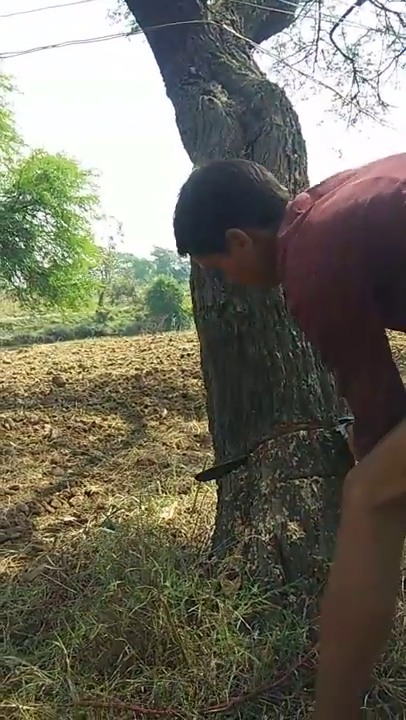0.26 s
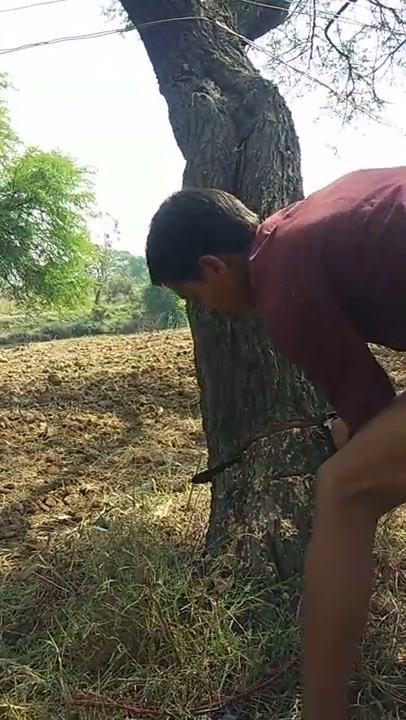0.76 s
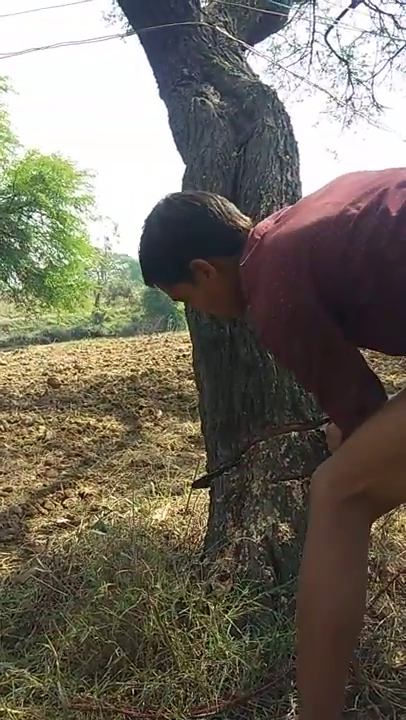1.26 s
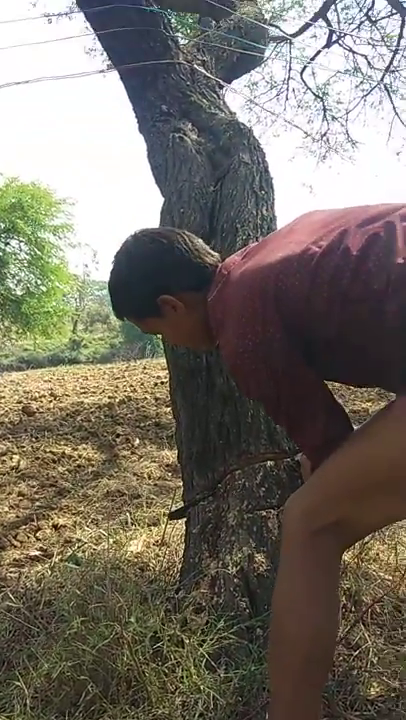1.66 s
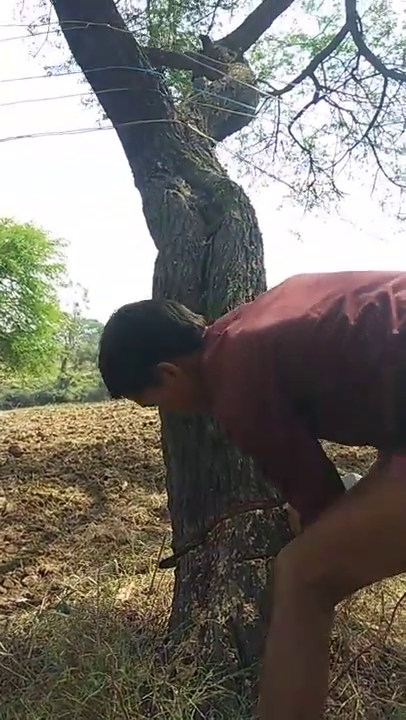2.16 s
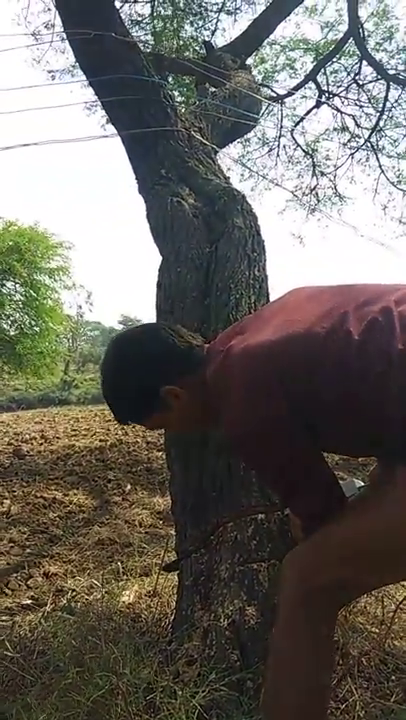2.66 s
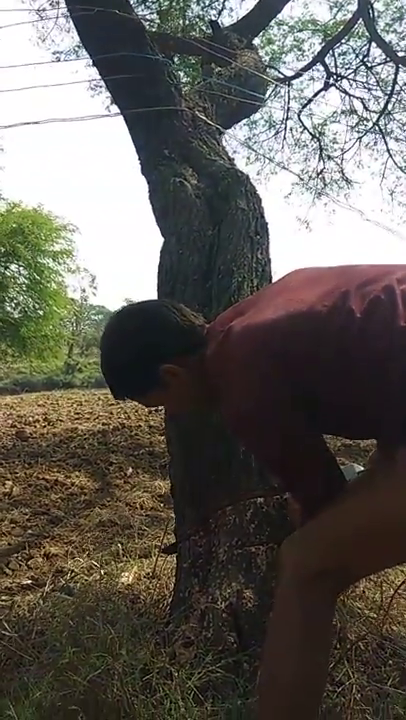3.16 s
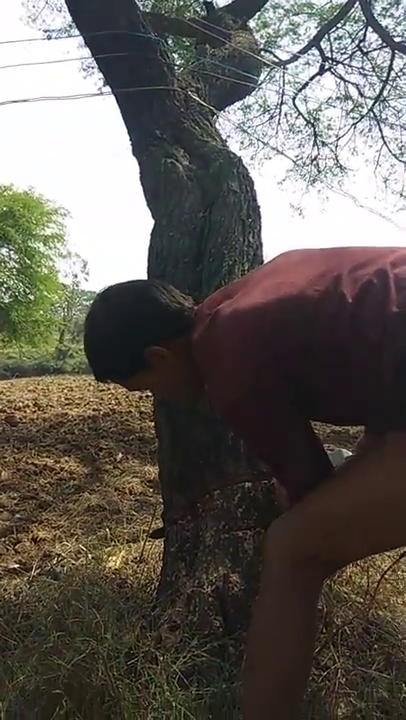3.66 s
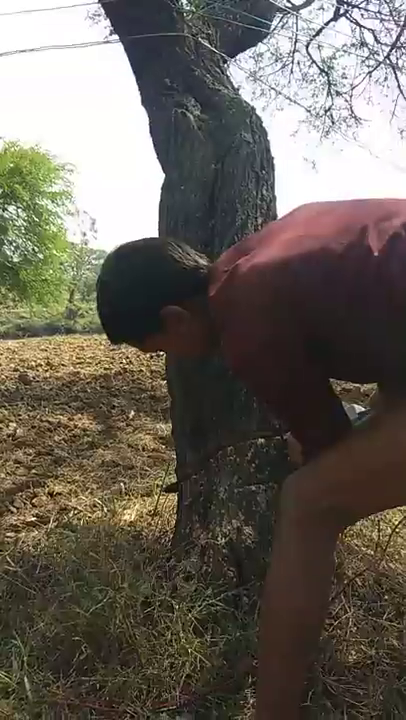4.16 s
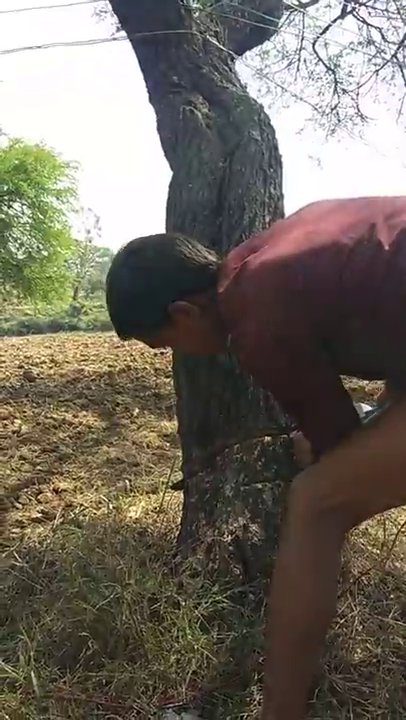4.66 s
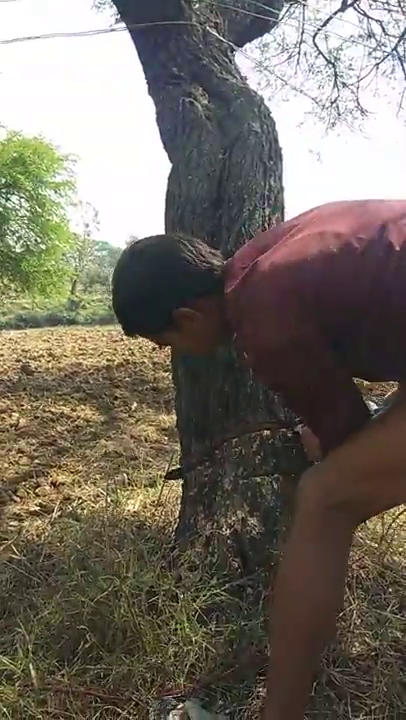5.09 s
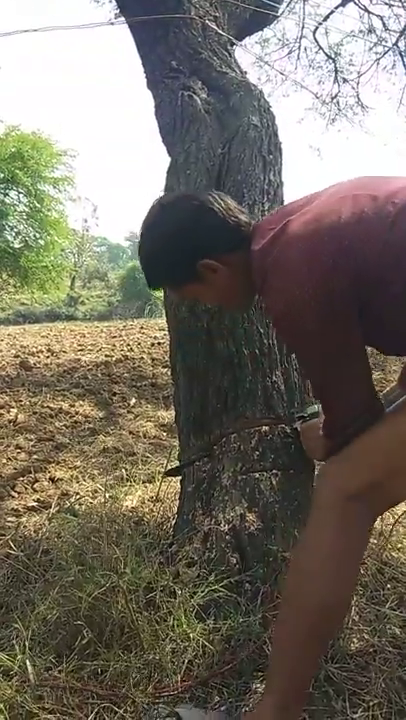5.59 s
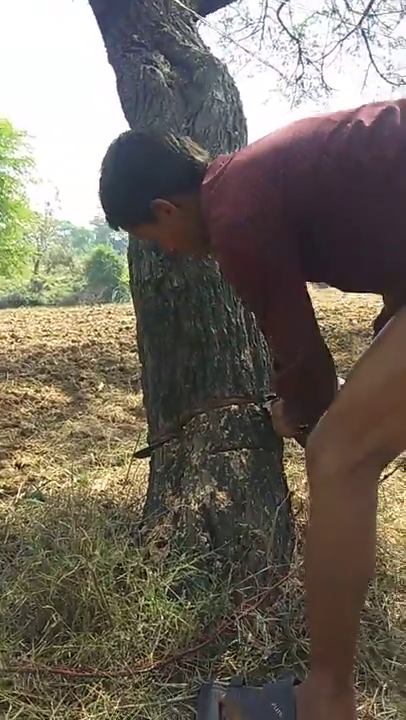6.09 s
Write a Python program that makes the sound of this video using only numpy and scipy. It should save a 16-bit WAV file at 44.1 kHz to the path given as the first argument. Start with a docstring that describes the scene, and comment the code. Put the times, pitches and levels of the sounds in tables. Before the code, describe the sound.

A small electric chainsaw is already running outdoors, its chain rattling and slapping on the steel bar over a thin hiss of fan air and chips. At about 0.5 seconds a high gear whine stands out and slides down as the saw bites into a tree trunk. From 1 to 3.5 seconds it labors at a lower, wavering pitch, swelling and nearly fading, with quieter chain noise. The housing knocks lightly on the trunk around 0.8, 1.5 and 2.5 seconds. From about 3.7 seconds the chain slaps and ticks more often and the whine climbs unevenly, dipping near 4.4 seconds, over a faint low hum. Pitch and clatter peak around 5.5 seconds. The whine then falls and dies away by about 5.8 seconds, while the chain keeps rattling more softly until the end at 6.3 seconds. Faint wind puffs thump the microphone in the last second or so.

```python
"""Electric chainsaw in a trunk.

A small saw cuts outdoors. Its gears whine on the tooth-mesh pitch, which sags under load. The chain rattles,
slaps and ticks on the steel bar, fan and chips hiss, the housing hums and knocks on the trunk, light wind
thumps. Two microphone ports a few centimetres apart hear it."""
import sys
import numpy as np
from scipy import signal
from scipy.fft import rfft, irfft, next_fast_len
from scipy.io import wavfile
from scipy.ndimage import uniform_filter1d, map_coordinates

SR = 44100
rng = np.random.default_rng(int(sys.argv[2]) if len(sys.argv) > 2 else 0)


def wav_record(signal):
    """Record a signal, one row per channel, as 16-bit PCM in the file named by sys.argv[1]."""
    frames = np.transpose(np.atleast_2d(signal))
    bounded = np.clip(frames, -1, 1)
    # unit amplitude maps onto the largest positive 16-bit level
    quanta = np.round(bounded * 32767).astype(np.int16)
    wavfile.write(sys.argv[1], SR, quanta)


N = 279153

# Running chain. Each row: time in seconds, bar ring in dB, clatter and hiss in dB.
CHAIN_LEVELS = [(0.0, -18, -24), (0.4, -26, -27.5), (0.51, -20.5, -21.5), (0.66, -28.5, -30),
                (0.97, -31.5, -37.5), (1.23, -33, -40), (3.28, -36, -42), (3.63, -33.5, -41),
                (3.83, -29.5, -36), (4.14, -27, -32.5), (4.3, -34.5, -37), (4.57, -33, -42.5),
                (4.9, -27.5, -33.5), (5.09, -26, -29), (5.55, -23, -23), (5.7, -24, -29.5),
                (6.01, -26.5, -36.5), (6.2, -29.5, -43), (6.33, -32.5, -46)]
# Bar and housing resonances. Each row: frequency in Hz, width in Hz, gain in dB.
BAR_MODES = [(807, 403, -8), (1136.3, 66.3, 5.5), (1708, 160, -3), (1730, 138, -2.5), (2138, 64, -8),
             (3372, 63, -11), (3920, 105, -15.5), (4900, 94, -20), (5775, 71, -15.5), (6210, 210, -20)]
# Link clatter spectrum. Each row: frequency in Hz, gain in dB.
CLATTER_SPECTRUM = [(400, -25), (700, -31.5), (1200, -3.5), (2600, -15.5), (3500, -12), (4900, -17),
                    (6200, -17), (8000, -28), (11000, -30.5)]
# Fan and chip spectrum. Each row: frequency in Hz, gain in dB.
HISS_SPECTRUM = [(6000, -15), (7000, 3.5), (7900, -6), (9400, 5.5), (10300, 1), (11200, 9), (13000, 8.5),
                 (15600, 9.5)]
# Housing hum. Each row: time in seconds, level in dB.
HUM_LEVELS = [(0, -52), (.7, -46.5), (1.1, -61), (3.45, -61.5), (3.87, -49), (4.4, -52.5), (4.55, -54),
              (4.74, -44.5), (5.08, -68), (5.25, -45.5), (5.5, -62), (6.33, -87)]
# Motor speed and tooth pressure. Each row: time in seconds, mesh pitch in Hz, whine in dB.
GEAR_MESH = [(0.46, 2014, -33), (0.53, 1925, -20), (0.61, 1800, -20), (0.7, 1610, -13), (0.84, 1287, -13),
             (0.9, 1135, -25.5), (1.18, 1138, -25), (1.21, 1075, -26), (1.28, 998, -22), (1.374, 906, -22),
             (1.564, 868, -26), (1.66, 915, -42), (1.8, 930, -40), (1.98, 893, -26), (2.104, 1023, -42.5),
             (2.356, 1061, -17), (2.504, 902, -40), (2.784, 1049, -28), (3.0, 878, -31.5),
             (3.266, 1052, -30), (3.542, 1053, -24), (3.7, 1158, -20), (3.78, 1164, -37.5),
             (3.9, 1228, -22), (4.226, 1297, -19.5), (4.39, 1016, -26), (4.8, 1189, -24), (4.86, 1253, -18),
             (4.96, 1350, -26.5), (5.52, 1980, -34), (5.6, 1733, -19), (5.67, 1602, -16), (5.76, 1510, -47),
             (6.33, 792, -74)]
# Partials above the mesh tone. Each row: multiple of the mesh pitch, gain in dB.
MESH_OVERTONES = [(2, -13), (3.05, -9.5), (4.099, -13), (5.1, -9), (6.1, -11.5)]
# Third partial, fading as the motor first bogs down. Each row: time in seconds, added gain in dB.
THIRD_PARTIAL_FADE = [(1.17, 5), (1.24, 0), (1.62, -12), (1.8, 6)]
# Gear case resonances. Each row: frequency in Hz, width in Hz, gain in dB.
CASE_MODES = [(1165, 74.5, 4.5), (1543, 330, -2), (1767, 177, 1), (2088, 150, 2), (2900, 120, -7),
              (3475, 370, -8.5), (3860, 200, -9.5), (4490, 710, -14), (6010, 190, -3)]
# Slack chain hitting the bar. Each row: time in seconds, relative level in dB.
CHAIN_SLAPS = [(0.0525, -8), (0.0765, -12), (0.1345, -5.5), (0.2134, -17), (0.2394, -10), (0.2938, -7.5),
               (0.3572, -7.5), (0.3716, -6.5), (0.4501, -17), (0.5306, -12), (0.5841, -19), (0.622, -8),
               (0.6874, -12), (0.9818, -13), (1.5359, -19.5), (1.923, -19), (2.406, -11.5), (2.801, -17),
               (3.398, -13), (3.4282, -17), (3.6091, -14), (3.624, -12), (3.7661, -5), (3.7821, -8),
               (3.804, -8.5), (3.8243, -11), (3.849, -9), (3.8907, -8.5), (4.0358, -10.5), (4.046, -15),
               (4.0588, -8.5), (4.1414, -10), (4.1878, -5.5), (4.653, -9), (4.8379, -10), (4.881, -5.5),
               (4.9229, -6), (4.9634, -12), (4.996, -10.5), (5.037, -4), (5.0738, -16), (5.111, -8),
               (5.1452, -11), (5.211, -12), (5.2426, -6.5), (5.396, -4), (5.4238, -15), (5.5115, -10),
               (5.5407, -7), (5.601, -8.5), (5.6412, -17), (5.6996, -13), (5.7328, -10.5), (5.8443, -12.5),
               (5.8863, -10.5), (5.9278, -8.5), (6.019, -6.5), (6.0673, -8.5), (6.119, -14), (6.1734, -8),
               (6.2345, -11), (6.3002, -12.5)]
# Sharp ticks. Each row: time in seconds, relative level in dB.
CHAIN_TICKS = [(0.621, -13), (0.648, -10.5), (0.902, -19.5), (3.739, -14), (3.993, -21.5), (4.37, -15.5),
               (4.649, -17.5), (4.99, -7.5), (5.618, -15.5), (5.824, -18), (5.949, -11), (6.039, -22),
               (6.142, -14), (6.204, -17.5), (6.265, -17)]
# Housing hitting the trunk. Each row: start in seconds, relative level in dB, hollow ring offset
# in dB, crack offset in dB.
HOUSING_KNOCKS = [(0.769, -33, 7.5, 13.5), (1.431, -41, -6.5, 8.5), (1.58, -36.5, -10, 12),
                  (2.493, -45, -8, 17), (2.582, -33, -5, 13.5), (6.077, -39.5, -11, 12.5)]
# Dry knock of the bark. Each row: frequency in Hz, gain in dB, T60 in seconds.
BARK_MODES = [(670, -5, 0.098), (785, 12, 0.036)]
# Hollow ring of the trunk. Each row: frequency in Hz, gain in dB, T60 in seconds.
HOLLOW_MODES = [(78, 8, 0.18), (127.6, 6, 0.21), (308, 16.5, 0.094), (452, 18, 0.046)]
# Wind buffeting spectrum. Each row: frequency in Hz, gain in dB.
WIND_SPECTRUM = [(30, 6), (90, 2.5), (200, -7), (300, -0.5), (600, -5), (900, -36)]
# Puffs on the ports. Each row: start in seconds, relative level in dB.
WIND_PUFFS = [(4.92, -55), (5.436, -49.5), (5.618, -46), (5.788, -49), (5.901, -52), (5.964, -53.5),
              (6.111, -57)]
# Noise coherence. Each row: frequency in Hz, share of power common to both ports.
PORT_COHERENCE = [(40, .15), (80, .45), (200, .85), (1200, .88), (2500, .55), (5000, .3), (9000, .12)]
# Port balance. Each row: frequency in Hz, left minus right in dB.
PORT_BALANCE = [(200, 1.5), (600, -4.5), (1170, 6), (1600, 0), (2700, 1.5), (6400, 7), (9800, 13),
                (15000, 1.5)]
# Port phase. Each row: frequency in Hz, left lead in radians.
PORT_PHASE = [(300, 0.17), (600, 0.14), (1200, 1.23), (2400, 0.97), (3600, 1.84)]

FFT_SIZE = next_fast_len(N + SR // 2)
BINS_HZ = np.fft.rfftfreq(FFT_SIZE, 1 / SR)


def amp(db):
    """Decibels to gain."""
    return 10 ** (np.asarray(db) / 20)


def unit(x):
    """Scale to RMS 1."""
    return x / np.sqrt(np.mean(x ** 2) + 1e-20)


def per_bin(rows):
    """(Hz, value) rows interpolated to FFT bins on a log axis."""
    hz, values = np.transpose(rows)
    return np.interp(np.log(BINS_HZ + 1), np.log(hz + 1), values)


def curves(rows):
    """One value per sample for each column after the time."""
    times_s, *columns = np.transpose(rows)
    return [np.interp(np.arange(N) / SR, times_s, column) for column in columns]


def wobble(rate_hz):
    """Smooth random curve, rate_hz knots a second."""
    knots = rng.standard_normal(int(N * rate_hz / SR) + 4)
    return map_coordinates(knots, [np.arange(N) * rate_hz / SR])


def filtered(x, response):
    """Apply a per-bin frequency response."""
    return irfft(rfft(x, FFT_SIZE) * response, FFT_SIZE)[..., :N]


def resonance(centre_hz, width_hz):
    """Causal band-pass response of one mode."""
    loss = 1j * BINS_HZ * width_hz
    return loss / (centre_hz ** 2 - BINS_HZ ** 2 + loss)


def port_noise(envelope, response=1):
    """Stereo noise under one envelope, partly common to both ports."""
    common, *own = rfft(envelope * rng.standard_normal((3, N)), FFT_SIZE)
    share = per_bin(PORT_COHERENCE)
    spectrum = np.sqrt(share) * common + np.sqrt(1 - share) * np.array(own)
    return irfft(response * spectrum, FFT_SIZE)[:, :N]


def bursts(starts_s, levels_db, t60_s, smooth_hz):
    """Envelope of decaying bursts, averaged over 1 / smooth_hz seconds."""
    impulses = np.bincount((starts_s * SR).astype(int), amp(levels_db), N)[:N]
    decays = signal.lfilter([1], [1, -amp(-60 / (t60_s * SR))], impulses)
    return uniform_filter1d(decays, size=SR // smooth_hz)


def link_contacts(rate_hz, spread_db, t60_s):
    """Envelope of random link hits of uneven strength."""
    count = int(rate_hz * N / SR)
    starts_s = rng.random(count) * (N - 1) / SR
    levels_db = spread_db * np.clip(rng.standard_normal(count), -2, 2)
    return unit(bursts(starts_s, levels_db, t60_s, smooth_hz=500))


def jingle(rate_hz, low_hz, high_hz, cycles, spread_db):
    """Loose links ring briefly, each with its own pitch and direction."""
    pitch, strength, start, pan = np.hsplit(rng.random((int(rate_hz * N / SR), 4)), 4)
    hz = low_hz * (high_hz / low_hz) ** pitch
    t = np.arange(SR // 80) / SR
    rings = amp(spread_db * strength) * np.sin(2 * np.pi * hz * t) * hz * t * np.exp(-hz * t / cycles)
    samples = ((start * N).astype(int) + np.arange(len(t))).ravel()
    sides = np.cos(np.pi * pan), np.sin(np.pi * pan)
    return unit(np.array([np.bincount(samples, (rings * side).ravel(), N)[:N] for side in sides]))


def bar_ring(level_db, flutter_db):
    """Link contacts ring the steel bar; a fast chain rings more evenly."""
    steady = np.interp(level_db, [-34, -24], [.3, 1.5])
    drive = (link_contacts(rate_hz=200, spread_db=2, t60_s=.03) + steady) * amp(.8 * flutter_db)
    bar = sum((-1) ** k * amp(db) * resonance(hz, width) for k, (hz, width, db) in enumerate(BAR_MODES))
    low_cut = 1 / (1 + (620 / (BINS_HZ + 1)) ** 8)
    return amp(level_db) * unit(port_noise(drive, bar * low_cut))


def link_clatter(level_db, flutter_db):
    """Links rattle and jingle; a chain buried in wood rattles less."""
    steady = np.interp(level_db, [-40, -30], [2.5, .6])
    rattle = unit(port_noise(link_contacts(rate_hz=300, spread_db=4, t60_s=.012) + steady))
    rattle += .45 * jingle(rate_hz=800, low_hz=1500, high_hz=7000, cycles=18, spread_db=6)
    clatter = filtered(rattle * amp(flutter_db + .4 * wobble(6)), amp(per_bin(CLATTER_SPECTRUM)))
    treble_rms = np.std(filtered(clatter, BINS_HZ > 2500))
    return amp(level_db) * clatter / treble_rms


def fan_and_chips(level_db, flutter_db):
    """Fan air and chips hiss in uneven bursts, with a fine jingle."""
    air = unit(port_noise(1))
    jingle_gain = np.interp(level_db, [-42, -32], [.2, .45])
    air += jingle_gain * jingle(rate_hz=500, low_hz=8000, high_hz=15500, cycles=40, spread_db=9)
    surges = amp(flutter_db + 2.4 * wobble(24))
    return amp(level_db) * unit(filtered(air * surges, amp(per_bin(HISS_SPECTRUM))))


def running_chain():
    """Ring, clatter and hiss under one shared flutter."""
    ring_db, noise_db = curves(CHAIN_LEVELS)
    flutter_db = np.clip(wobble(14), -2, 1.3)
    ring = bar_ring(ring_db, flutter_db)
    return ring + link_clatter(noise_db, flutter_db) + fan_and_chips(noise_db, flutter_db)


def housing_hum(centre_hz=205, half_width_hz=35):
    """The housing hums in a narrow, wavering noise band."""
    band = 1 / (1 + ((BINS_HZ - centre_hz) / half_width_hz) ** 2)
    return amp(curves(HUM_LEVELS)[0]) * unit(port_noise(amp(2.9 * wobble(20)), band))


def tooth_contact(depth_db, rate_hz):
    """Fluttering gain: the gear teeth lose contact now and then."""
    return amp(depth_db * np.clip(wobble(rate_hz), -3, 1))


def gear_whine(mesh_per_throb=11, overtone_db_per_db=.39):
    """Mesh partials swell across the case resonances; a slow throb rides on the whine."""
    mesh_hz, whine_db = curves(GEAR_MESH)
    jitter = 1 + .007 * wobble(30) + .007 * wobble(150)
    phase = 2 * np.pi * np.cumsum(mesh_hz * jitter) / SR
    throb = 1 + .15 * np.cos(phase / mesh_per_throb + wobble(24))
    tone = amp(-1.5) * tooth_contact(depth_db=5.5, rate_hz=55) * np.sin(phase)
    lag_db = (overtone_db_per_db - 1) * (whine_db + 22)  # overtones grow less than the mesh tone
    fade_db = curves(THIRD_PARTIAL_FADE)[0]
    for multiple, db in MESH_OVERTONES:
        gain = amp(db + lag_db + fade_db * (round(multiple) == 3))
        gain *= tooth_contact(depth_db=5.2, rate_hz=60)
        tone += gain * np.sin(multiple * (phase + .22 * wobble(300)))
    case = sum(amp(db) * resonance(hz, width) ** 2 for hz, width, db in CASE_MODES)
    return filtered(np.sqrt(2) * amp(whine_db) * throb * tone, case)


def strike_bar(events, tilt_db_per_octave, rise_s, damping):
    """Each dragging blow swells and dies on the bar's modes, at new strengths and tunings."""
    out, t = np.zeros(N + SR), np.arange(SR // 22) / SR
    hz, width_hz, mode_db = np.transpose(BAR_MODES)
    mode_db = mode_db + tilt_db_per_octave * np.log2(hz / 1000)
    mode_db -= mode_db.max()
    attack = 1 - np.exp(-(t / rise_s) ** 2)
    envelopes = attack[:, None] * np.exp(-np.pi * damping * np.outer(t, width_hz))
    for time_s, db in events:
        size, detune, phase = rng.standard_normal((3, len(hz)))
        gains = amp(db + mode_db + 2.2 * size * (mode_db < 0))  # the leading mode keeps its level
        modes = np.sin(2 * np.pi * (np.outer(t, hz * (1 + .033 * detune)) + phase))
        out[round((time_s - rise_s / 3) * SR):][:len(t)] += (envelopes * modes) @ gains
    return out[:N]


def chain_slaps():
    """Slack chain thumps the bar's main mode, mostly once a lap as its joint comes round."""
    return 4.5 * strike_bar(CHAIN_SLAPS, tilt_db_per_octave=-1.43, rise_s=.004, damping=1.6)


def chip_spray():
    """Chips spray at each tick; each slap crackles a little."""
    chips = jingle(rate_hz=350, low_hz=2000, high_hz=15000, cycles=30, spread_db=5)
    chips += rng.standard_normal((2, N))
    tick_s, tick_db = np.transpose(CHAIN_TICKS)
    slap_s, slap_db = np.transpose(CHAIN_SLAPS)
    envelope = bursts(tick_s + .0016, tick_db - 6.5, t60_s=.031, smooth_hz=70)
    envelope += bursts(slap_s + .0018, slap_db - 24, t60_s=.031, smooth_hz=300)
    mid_band = (BINS_HZ > 1500) * (BINS_HZ < 7000)
    return filtered(envelope * chips, .45 * mid_band + amp(per_bin(HISS_SPECTRUM) - 5))


def chain_ticks():
    """Sharp ticks ring the bar's upper modes."""
    return 1.23 * strike_bar(CHAIN_TICKS, tilt_db_per_octave=5.5, rise_s=.00279, damping=.85)


def wood_ring(modes, t):
    """Damped wood modes, varied a little in level and pitch per hit."""
    return sum(amp(db + rng.normal(0, .67) - 60 * t / t60_s)
               * np.sin(2 * np.pi * hz * rng.normal(1, .025) * t) for hz, db, t60_s in modes)


def housing_knocks():
    """Housing hits trunk: a crack and a dry knock, then the hollow wood thuds, swells and dies."""
    rings, t = np.zeros(N + SR), np.arange(SR // 5) / SR
    swell = 1 - np.exp(-t / .0077)
    for start_s, db, hollow_db, _ in HOUSING_KNOCKS:
        bark = amp(db + 5.5) * wood_ring(BARK_MODES, t)
        hollow = amp(db + hollow_db) * swell * wood_ring(HOLLOW_MODES, t)
        rings[round(start_s * SR):][:len(t)] += bark + hollow
    start_s, db, hollow_db, crack_db = np.transpose(HOUSING_KNOCKS)
    thuds = bursts(start_s + .0089, db + hollow_db + 29, t60_s=.1, smooth_hz=60)
    cracks = bursts(start_s, db + crack_db + 10, t60_s=.048, smooth_hz=200)
    dull = BINS_HZ / (BINS_HZ + 200) / (1 + (BINS_HZ / 700) ** 4)
    bright = BINS_HZ / 5500 * np.exp(-(BINS_HZ / 7000) ** 3) + .75 * (BINS_HZ < 7000)
    return rings[:N] + port_noise(thuds, dull) + port_noise(cracks, bright)


def wind(buffet_db=-51):
    """Faint low buffeting on the ports; single puffs thump near the end."""
    buffet = unit(port_noise(amp(4 * wobble(14)), amp(per_bin(WIND_SPECTRUM))))
    start_s, db = np.transpose(WIND_PUFFS)
    puffs = bursts(start_s + .0013, db + 47.5, t60_s=.17, smooth_hz=60)
    bass = BINS_HZ / 90 / (1 + (BINS_HZ / 110) ** 4)
    return amp(buffet_db) * buffet + port_noise(puffs, bass)


def scene():
    """All sources, with the level and phase offsets between the ports."""
    saw = gear_whine() + running_chain() + housing_hum()
    impacts = chip_spray() + chain_slaps() + chain_ticks() + housing_knocks()
    left = amp(per_bin(PORT_BALANCE) / 2) * np.exp(.5j * per_bin(PORT_PHASE))
    return filtered(saw + impacts + wind(), np.array([left, 1 / left]))


def record(dry):
    """The input rounds off peaks and limits the band; the microphones lose deep bass."""
    ceiling, bass_hz, top_hz = .85, 60, 15800
    rounded = dry / (1 + (dry / ceiling) ** 4) ** .25
    high_pass = (1j * BINS_HZ / (bass_hz + 1j * BINS_HZ)) ** 4
    return filtered(rounded, high_pass * (BINS_HZ < top_hz))


dry = scene()
out = record(dry)
wav_record(out)
```